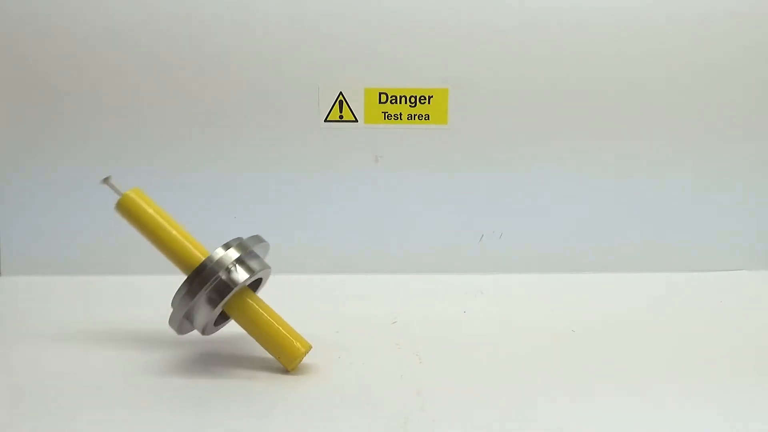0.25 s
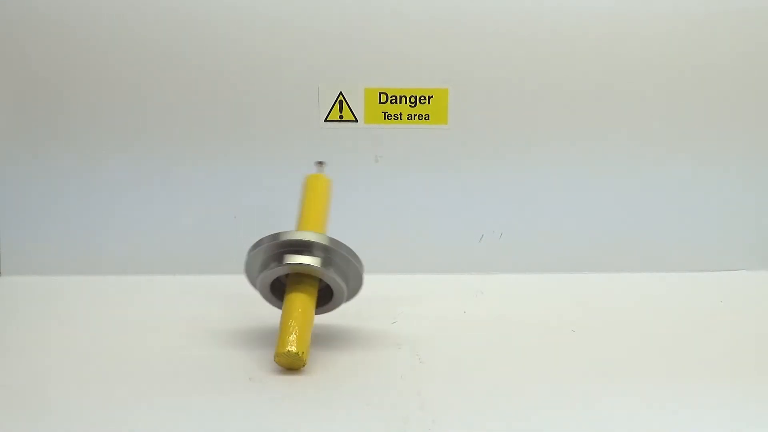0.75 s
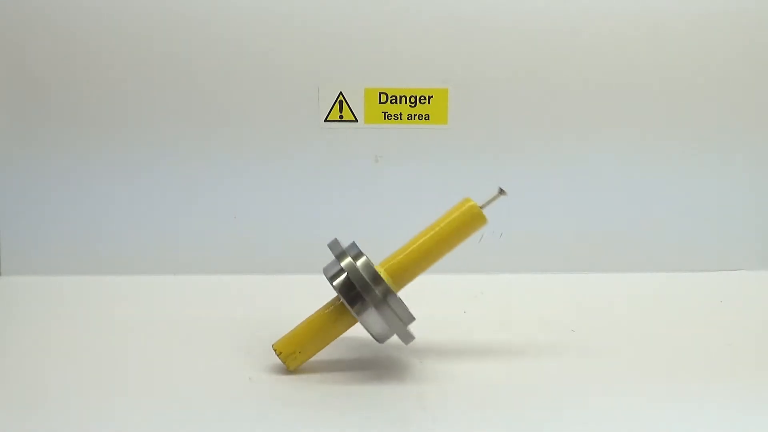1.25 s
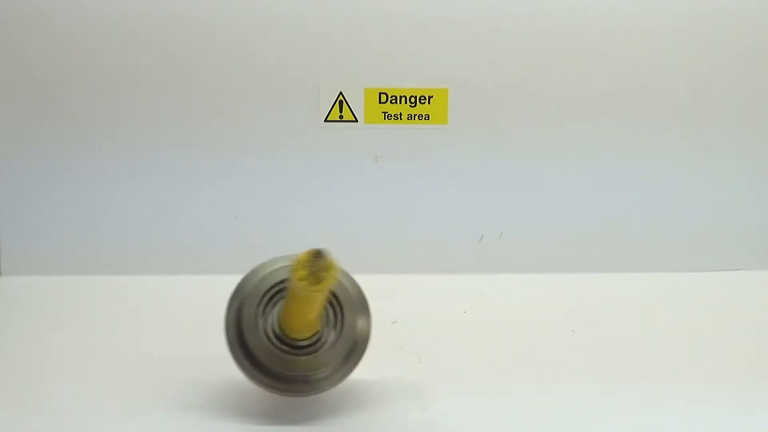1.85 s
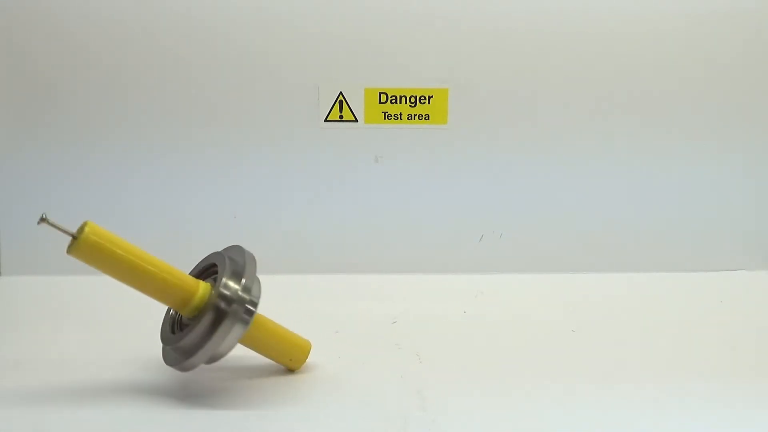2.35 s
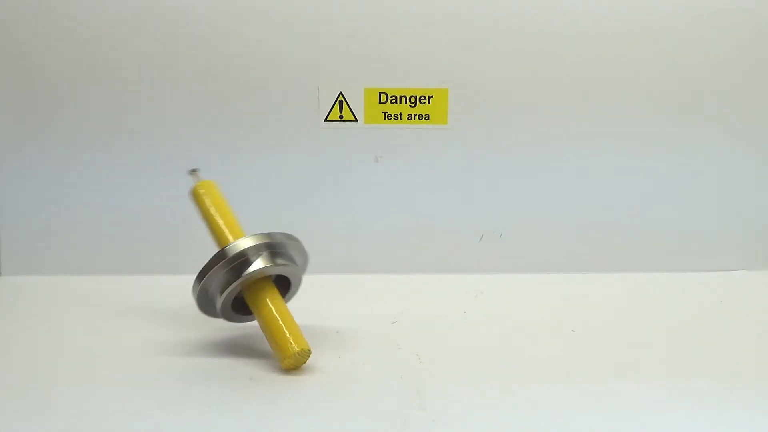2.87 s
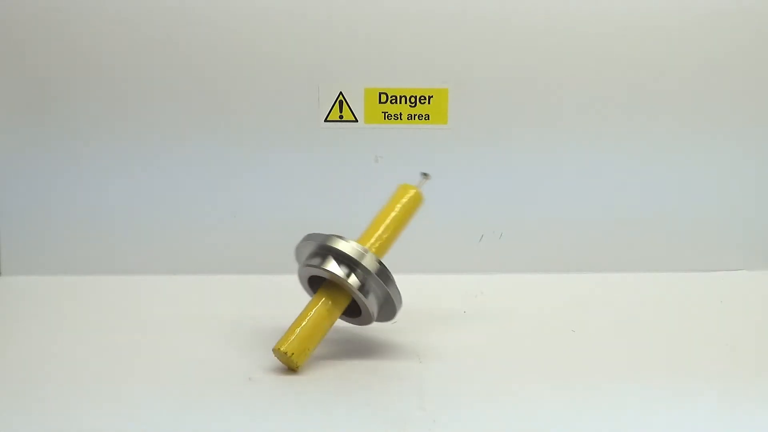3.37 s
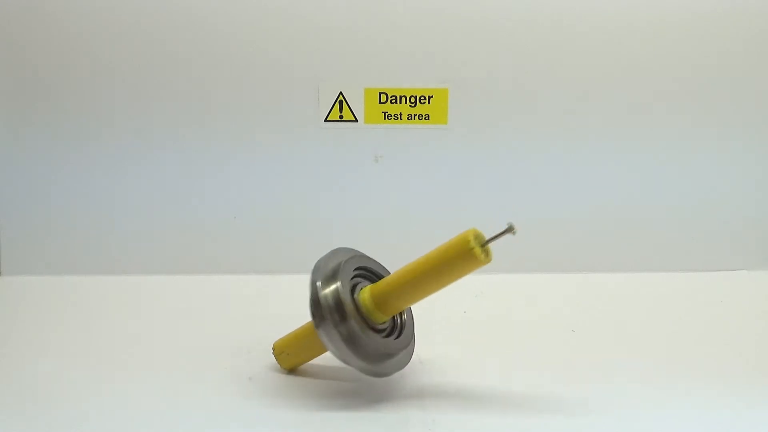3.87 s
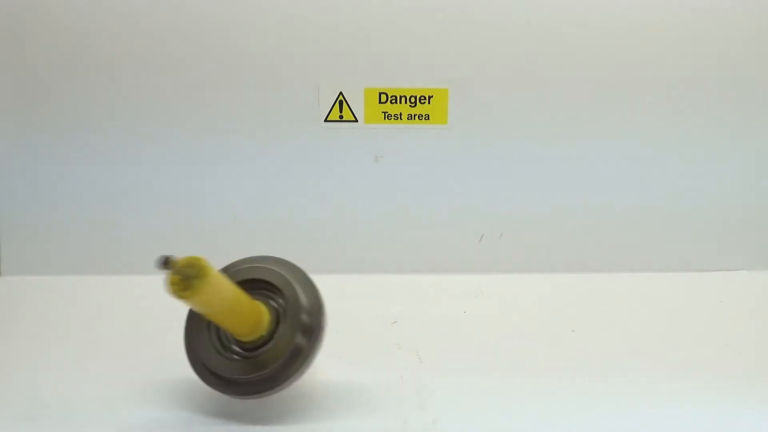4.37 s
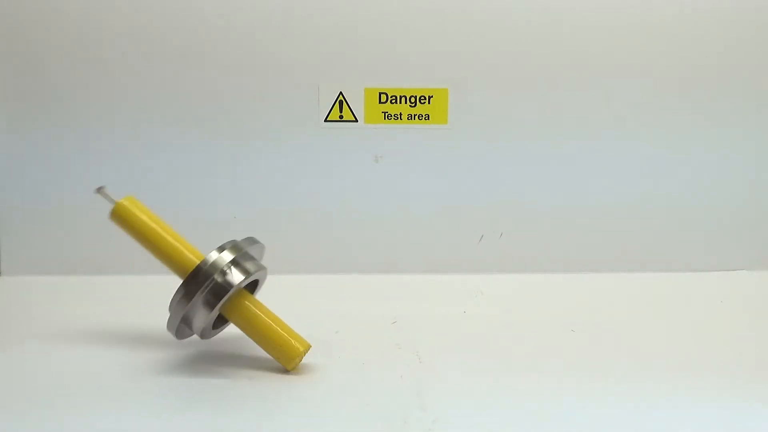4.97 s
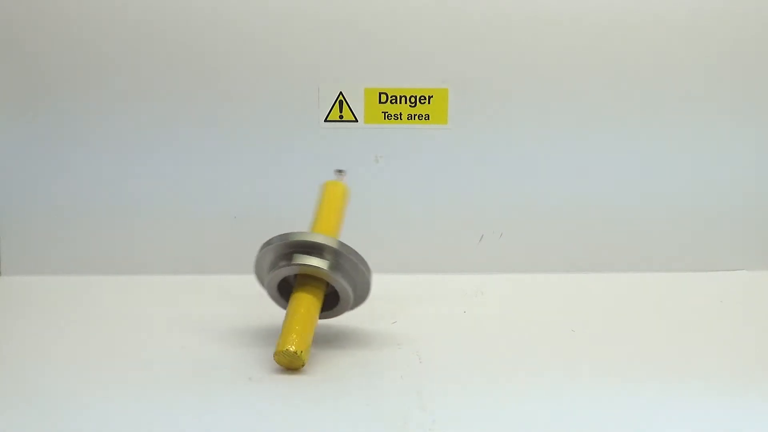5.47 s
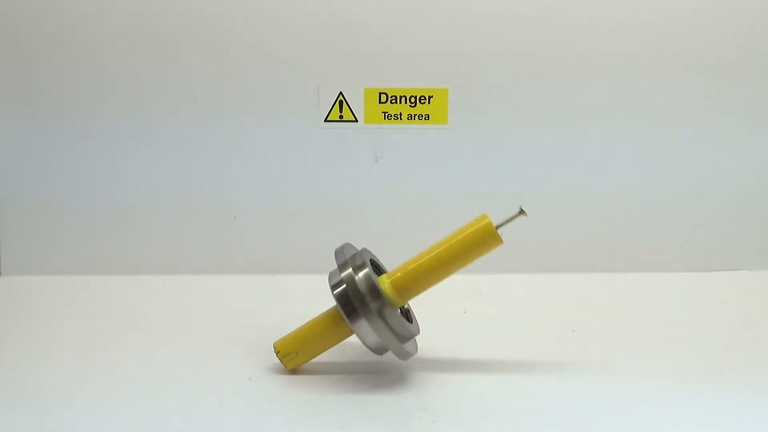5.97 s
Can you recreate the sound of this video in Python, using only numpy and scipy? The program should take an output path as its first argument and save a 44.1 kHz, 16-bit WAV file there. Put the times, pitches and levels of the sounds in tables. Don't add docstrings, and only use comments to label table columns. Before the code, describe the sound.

A heavy steel ring spins very fast on ball bearings around a tilted rod standing on a table. A dense, bright, hissing metallic whir runs without a break, finely rough and flickering, its timbre wavering about every 2.3 seconds as the rod swings round. Underneath are a faint steady low hum and soft table rumble. Close stereo microphone, small quiet room, very short reflections; no start or stop.

```python
import sys
import numpy as np
from scipy import signal
from scipy.fft import rfft, irfft
from scipy.io import wavfile
from scipy.ndimage import map_coordinates

SR = 44100
rng = np.random.default_rng(int(sys.argv[2]) if len(sys.argv) > 2 else 0)


def digitize_waveform(pressure):
    field = np.atleast_2d(pressure).T
    bounded = np.clip(field, -1, 1)
    quanta = np.round(bounded * 32767).astype(np.int16)
    wavfile.write(sys.argv[1], SR, quanta)


def invert_db(level):
    return 10 ** (np.asarray(level, dtype=float) / 20)


N = 274302
LEFTMOST_DEG = 85
# hz, left_minus_right_db
LEFT_BIAS = [(30, 1), (100, 5), (250, 6), (360, -4), (450, -1), (700, 1.5), (1500, 0.1), (4400, 1.15),
             (15000, -0.15)]


def rms_one(x):
    return x / np.sqrt(np.mean(x ** 2) + 1e-20)


def in_time(rows):
    s, *columns = np.transpose(rows)
    return [np.interp(np.arange(N) / SR, s, column) for column in columns]


def at_hz(points, hz):
    points_hz, points_db = np.array(points)[:, 0], np.array(points)[:, 1]
    return np.interp(np.log(hz), np.log(points_hz), points_db)


def drift(rate_hz):
    r = np.exp(-80 * np.pi * rate_hz / SR)
    slow = signal.lfilter([1], [1, -2 * r, r * r], rng.standard_normal(N // 40 + 2002))[2000:]
    return np.interp(np.arange(N) / 40, np.arange(len(slow)), rms_one(slow))


def coloured(x, spectrum, low_hz, high_hz):
    hz = np.arange(1, N // 2 + 2) * SR / N
    in_band = (hz > low_hz) * (hz < high_hz)
    return rms_one(irfft(rfft(x) * invert_db(at_hz(spectrum, hz)) * in_band, N))


def resonate(x, hz, width_hz):
    r = np.exp(-np.pi * width_hz / SR)
    b = [1, 0.0091, -1.01]
    a = [1, -2 * r * np.cos(2 * np.pi * hz / SR), r * r]
    return rms_one(signal.lfilter(b, a, signal.lfilter(b, a, x)))


def sliding(drive, hz, width_hz):
    carrier = np.exp(2j * np.pi * np.cumsum(hz) / SR)
    r = np.exp(-np.pi * width_hz / SR)
    slow = signal.lfilter([1], [1, -2 * r, r * r], drive / carrier)
    return rms_one(np.real(slow * carrier))


def sweep():
    precession_s, facing_s = 2.343, 1.9
    return 2 * np.pi * (np.arange(N) / SR - facing_s) / precession_s


def lobed(pairs):
    return sum(size * np.cos((k + 1) * sweep() - np.radians(deg)) for k, (size, deg) in enumerate(pairs))


def heard(part):
    part_db = [
        -36.5,
        -23,
        -24,
        -19.5,
    ]
    # swing_db, loudest_deg
    part_beams = [
        [(1.76, 180), (2, 162), (0.36, 192), (0.8, 160)],
        [(1.0, 190), (1.5, 201), (0.33, 197), (0.88, 195)],
        [(0, 280), (1.85, 30), (0.6, 21), (0.9, 67)],
        [(1.0, 300), (0.63, 14), (0.3, 326), (0.55, 12)],
    ]
    # swing_db, crest_deg
    side_lobes = [
        (-1.3, -11),
        (-1, -10.5),
        (-2.5, -13.5),
        (0.8, -14),
    ]
    lobes_per_sweep, centre_deg, focus = 7.7, -21, 1.6
    angle = np.angle(np.exp(1j * sweep()))
    fade = np.exp(focus * (np.cos(angle - np.radians(centre_deg)) - 1))
    swing_db, crest_deg = side_lobes[part]
    fringes = np.cos(lobes_per_sweep * (angle - np.radians(crest_deg)))
    return part_db[part] + lobed(part_beams[part]) + swing_db * fade * fringes


def placed(x, hz):
    # hz, swing_db
    sway = [(100, -1), (1700, 1), (5000, -0.6), (11000, 0.6)]
    pan_db = at_hz(LEFT_BIAS, hz) + at_hz(sway, hz) * np.cos(sweep() - np.radians(LEFTMOST_DEG))
    return x * invert_db(pan_db * [[.5], [-.5]])


def rolling(ticks_per_s, spread_db):
    sizes_db = spread_db * np.minimum(rng.exponential(1, (2, N)), 4)
    sizes = invert_db(sizes_db) * rng.choice([-1, 1], (2, N))
    ticks = sizes * (rng.random((2, N)) < ticks_per_s / SR)
    return rng.standard_normal((2, N)), rms_one(ticks)


def rolling_hiss(part, drive, low_hz, high_hz):
    # hz, db_per_hz
    hiss_spectrum = [(180, -47), (300, -14), (354, -30), (469, -6.5), (710, -22), (1040, -26),
                     (1270, -11.5), (1760, -2), (2540, -9.5), (3310, -2), (5440, -4.5), (7330, -20.5),
                     (8510, -13.5), (11300, -4), (15700, -10.5)]
    hiss_db = [
        -43,
        -27.5,
        -33,
        -21,
    ]
    uneven_db = [
        0.74,
        0.76,
        0.93,
        0.46,
    ]
    hiss = coloured(drive[0, ::-1], hiss_spectrum, low_hz, high_hz)
    return invert_db(hiss_db[part]) * hiss * invert_db(uneven_db[part] * drift(3.8)), invert_db(2 * hiss_db[part])


def modes(drive, low_hz, high_hz, flicker_db):
    # hz, width_hz, rms_db
    table_modes = [(479, 79, -43.5), (626, 65, -49), (849, 102, -48.5), (1056, 104, -41),
                   (1333, 230, -47.5)]
    rod_modes = [(1584, 94, -37), (1800, 102, -36.5), (2192, 247, -35), (2345, 300, -45),
                 (2818, 140, -37.5), (3130, 150, -36), (3362, 60, -34.5), (3625, 75, -42),
                 (3816, 110, -37.5), (4065, 210, -37), (4660, 440, -34.5), (5057, 390, -34),
                 (5730, 230, -35.5), (6290, 720, -30.5)]
    ring_modes = [(6830, 730, -34), (7090, 220, -35), (7324, 250, -30.5), (7603, 190, -29),
                  (9010, 480, -34.5), (10140, 590, -29.5), (10780, 580, -35.5), (11180, 590, -21.5),
                  (11960, 560, -25), (12760, 450, -30.5), (13800, 590, -29.5)]
    # one_lobe_db, angle_deg, two_lobes_db, angle_deg, three_lobes_db, angle_deg
    table_beams = [(5, 240, 3.2, 360, -0.3, 8.3), (1.5, 470, 4.5, 12, 2, 76),
                   (-5.7, 193, -0.2, 200, -1.1, 52.0), (2.5, 47, 1.5, 130, 0.2, 130),
                   (4, 25, 2.5, 140, 0.5, 121.0)]
    rod_beams = [(3, 12, 6, 202, 1, 194), (6, 358, 9, 190, 3.5, 14), (1.5, 106, 2.2, 140, 0.3, 89),
                 (5.5, 16, 3, 126, 5, 200), (2, 6.0, 3, 210, 0.5, 156), (-5.5, 21, 2, 220, 3, 54),
                 (5.5, 215, 3.7, 310, 5.5, 334), (11, 46, 9.5, 240, 5, 450), (2.5, 300, -2.5, 4.0, -5, 180),
                 (8.5, 224, 7.5, 297, -2, 190), (4, 215, 0.5, 12.0, 1.2, 234.0), (1.5, 190, 1, 160, 4, 42),
                 (0.5, 530, 1.5, 35, 5, 190), (3, 324, -0.5, 36.0, -1.9, 190)]
    ring_beams = [(14, 210, -2, 350, 4.5, 157), (-4.5, 68, 8, 38, 6, 30.0), (-1, 10.0, -2.5, 30.0, 3, 190),
                  (-6, 65, 0, 200, -1, 260), (4.5, 75, 1, 170, 2, 145), (4, 24, 5.3, 203, 2, 48),
                  (10, 35, -5, 120, -8, 49), (2.5, 56, 2.5, 390, -0.5, 810), (-3, 130, -1, 360, 1, 294.0),
                  (-3, 220, 3, 320, 0, 136.0), (0.5, 160, 3, 22.0, 1, 160)]
    body = zip(table_modes + rod_modes + ring_modes, table_beams + rod_beams + ring_beams)
    sound, power = np.zeros(N), 0
    for k, ((hz, width_hz, level_db), beam) in enumerate(body):
        if low_hz <= hz < high_hz:
            gain = invert_db(level_db + 0.82 * lobed(list(zip(beam[::2], beam[1::2]))))
            ring = gain * resonate(drive[k % 2], hz, 1.525 * width_hz) * invert_db(flicker_db * drift(7.2))
            sound += ring * (-1) ** (k // 2)
            power = power + gain ** 2
    return sound, power


def ridges(part):
    # (swing_hz, highest_deg)
    slides = [
        (1749, [(12, 170), (74.5, 66), (30, 11), (20, 226)]),
        (3480, [(220, 198.6), (60, 200), (30, 190), (20, 58)]),
        (11260, [(130, 190), (120, 1), (50, 262), (60, 210)]),
    ]
    # part, width_hz, rms_db
    shapes = [
        (1, 117, -36),
        (1, 166, -34),
        (3, 690, -21),
    ]
    sound, power = np.zeros(N), 0
    for (hz, slide), (where, width_hz, level_db) in zip(slides, shapes):
        if round(where) == part:
            sound += invert_db(level_db) * sliding(rng.standard_normal(N), hz + lobed(slide), width_hz)
            power += invert_db(2 * level_db)
    return sound, power


def bearing():
    parts_hz = [
        300,
        1400,
        6500,
        8200,
        15850,
    ]
    tick_db = [
        -4,
        -3,
        -2.5,
        -8.5,
    ]
    # shared_load_db, own_db, each_mode_db
    flicker = [
        (0.34, 0.74, 0.6),
        (0.56, -0.24, 1.8),
        (0, 0.87, 1),
        (0.39, 0.17, 2.5),
    ]
    fine, ticks = rolling(ticks_per_s=600, spread_db=6.0)
    load = drift(13.5) + 1.33 * drift(78)
    out = np.zeros((2, N))
    for part, (load_db, own_db, mode_db) in enumerate(flicker):
        low_hz, high_hz = parts_hz[part:part + 2]
        drive = fine + invert_db(tick_db[part]) * ticks
        hiss, hiss_power = rolling_hiss(part, drive, low_hz, high_hz)
        ringing, ringing_power = modes(drive, low_hz, high_hz, mode_db)
        ridge, ridge_power = ridges(part)
        power = hiss_power + ringing_power + ridge_power
        level_db = heard(part) + load_db * load + own_db * drift(28)
        sound = (hiss + ringing + ridge) * invert_db(level_db) / np.sqrt(power)
        out += placed(sound, np.sqrt(low_hz * high_hz))
    return out


def echoes(x):
    # delay_ms, swing_ms, latest_deg, level_db
    paths = [(1.336, 0.27, 13.5, -13), (1.147, 0.17, 24, -22), (2.7, 0.586, 17.5, -19),
             (3.8, 0.423, 33, -17.5)]
    out, at = x.copy(), np.arange(N)
    dull = signal.lfilter(*signal.butter(1, 7300, fs=SR), x.mean(axis=0))
    for delay_ms, swing_ms, latest_deg, level_db in paths:
        lag = (delay_ms + swing_ms * np.cos(sweep() - np.radians(latest_deg))) * SR / 1000
        out += invert_db(level_db) * map_coordinates(dull, [at - lag], order=3)
    return out / np.sqrt(1 + .5 * np.sum(invert_db(2 * np.array(paths)[:, 3])))


def hum():
    # time_s, turns_per_s
    spin = [
        (0.0, 99.82),
        (6.22, 91.5),
    ]
    # time_s, level_db
    unbalance = [(0.0, -48), (0.05, -47), (0.26, -40), (0.95, -39), (1.12, -40), (1.71, -41.5), (1.78, -46),
                 (2.36, -44.5), (3.2, -38.5), (4.83, -48.5), (5.35, -46.5), (6.22, -47.5)]
    # multiple_of_spin, rms_db, swing_db, loudest_deg, trend_db_per_s, left_minus_right_db
    orders = [(0.674, -62, 6, 220, 0.3, 1.7), (1.251, -69, 7, 310, 0.5, 7), (1.416, -64, 4, 67, 1, 0),
              (1.498, -66, 1, 18, 0, 2.1), (1.671, -50, 2, 130, 0, 1.5), (1.834, -61, 6.5, 290, 1, 8.5),
              (9.05, -59, 5, 120, -0.5, 3), (2.25, -68, 10, 11, -3, 3), (2.347, -61, 5, 90, -0.5, -2),
              (2.498, -67.5, 10, 130, 0.5, 6), (2.605, -53.5, 1, 150, -1.24, 6.5),
              (2.673, -65.5, 2, 58, -0.5, -4), (3.083, -59.5, -1.5, 156, -1.5, 4),
              (3.248, -59, -3.5, 330, 0.6, 6), (3.859, -72, -2, 120, 1, -0.6),
              (4.275, -62, -6.5, 276, -2, -6), (4.496, -54, 1.5, 210, 1, -1),
              (4.534, -55.5, 5, 200, -2.7, -3), (4.951, -50.5, 5, 150, 1.56, -6),
              (6.745, -55.5, 4.5, 160, 1, -2)]
    turns_rad = 2 * np.pi * np.cumsum(in_time(spin)[0]) / SR
    s = np.arange(N) / SR
    tones = [(1, in_time(unbalance)[0], 3.0)]
    for multiple, level_db, swing_db, loudest_deg, trend_db, pan_db in orders:
        swing = swing_db * np.cos(sweep() - np.radians(loudest_deg))
        tones.append((multiple, level_db + swing + trend_db * (s - s.mean()), pan_db))
    out = np.zeros((2, N))
    for multiple, swell_db, pan_db in tones:
        tone = np.sin(multiple * turns_rad + rng.uniform(0, 2 * np.pi) + 0.21 * drift(3.7))
        out += np.sqrt(2) * invert_db(swell_db + np.array([[pan_db / 2], [-pan_db / 2]])) * tone
    return out


def walls(x, t60_s, level_db, cut_hz, bright_db):
    s = np.arange(SR // 5) / SR
    tail = rng.standard_normal((2, len(s))) * invert_db(-60 * s / t60_s) * (s > .002)
    tail = tail / np.sqrt(np.sum(tail ** 2, axis=1, keepdims=True))
    dull = signal.lfilter(*signal.butter(1, cut_hz, fs=SR), x)
    swing_db = 0.97 * np.cos(sweep() - np.radians(LEFTMOST_DEG))
    sent = (dull + invert_db(bright_db) * (x - dull)) * invert_db(swing_db)
    return invert_db(level_db) * signal.fftconvolve(sent, tail, axes=1)[:, :N]


def rumble():
    # hz, db_per_hz
    rumble_spectrum = [(12, -50), (20, -20), (43, -6), (87, -6.5), (168, -4.5), (203, -6), (246, -3),
                       (351, -9.5), (420, -2), (550, -36), (920, -120)]
    mid = coloured(rng.standard_normal(N), rumble_spectrum, 15, 420)
    side = coloured(rng.standard_normal(N), rumble_spectrum, 70, 420)
    tilt = invert_db(at_hz(LEFT_BIAS, np.arange(1, N // 2 + 2) * SR / N) * [[.5], [-.5]])
    return invert_db(-49) * (irfft(rfft(mid) * tilt, N) + invert_db(-20) * side * [[1], [-1]])


def scene():
    near = echoes(bearing()) + hum()
    return near + walls(near, t60_s=0.15, level_db=-22, cut_hz=2800, bright_db=1) + rumble()


def low_pass(x):
    return signal.sosfilt(signal.butter(12, 16440, fs=SR, output="sos"), x)


def record(dry):
    rounded = 1.1 * np.tanh(dry / 1.1)
    below_top = np.arange(N // 2 + 1) * SR / N < 15735
    return low_pass(irfft(rfft(rounded) * below_top, N))


dry = scene()
out = record(dry)
digitize_waveform(out)
```